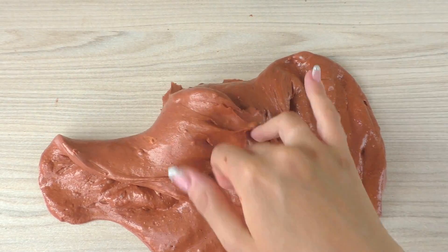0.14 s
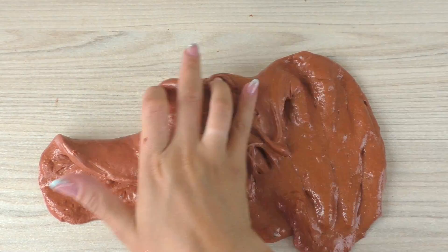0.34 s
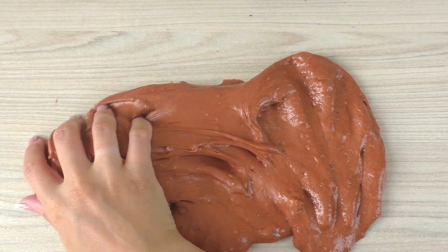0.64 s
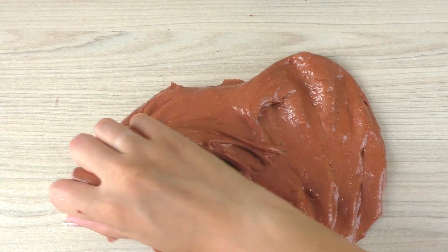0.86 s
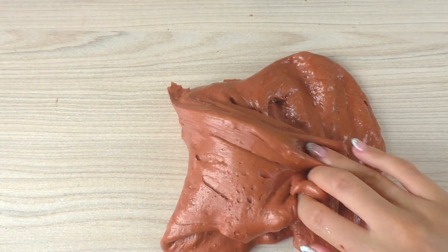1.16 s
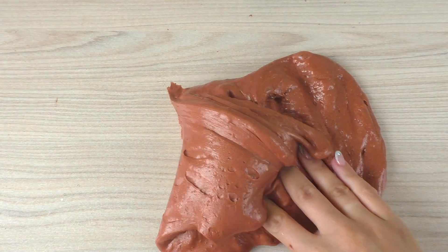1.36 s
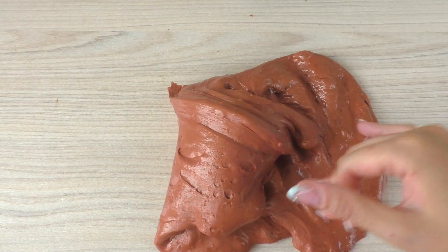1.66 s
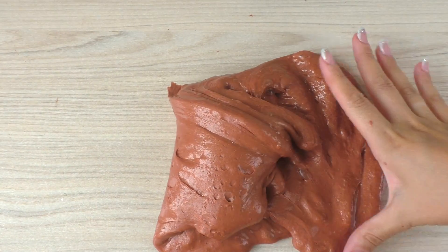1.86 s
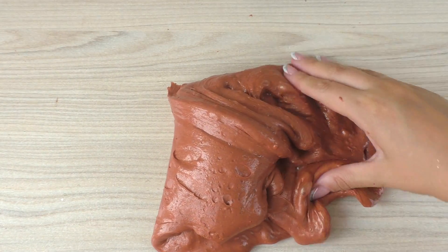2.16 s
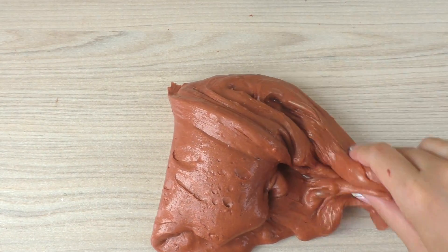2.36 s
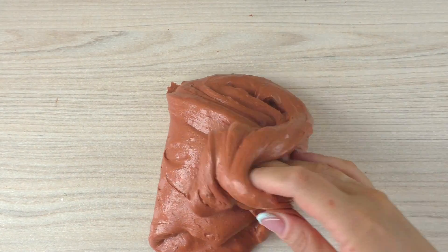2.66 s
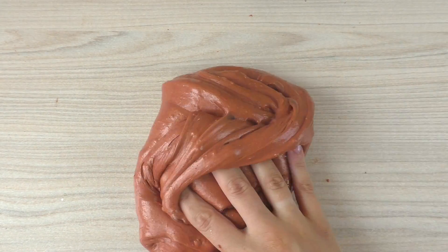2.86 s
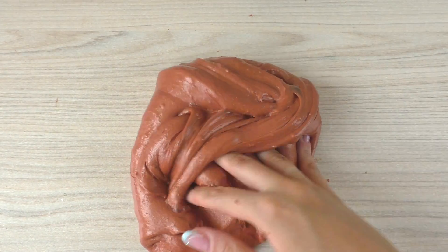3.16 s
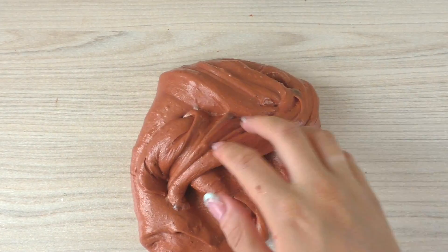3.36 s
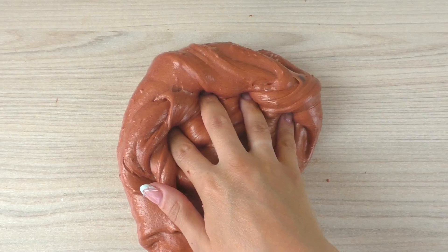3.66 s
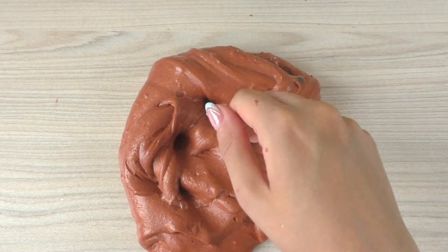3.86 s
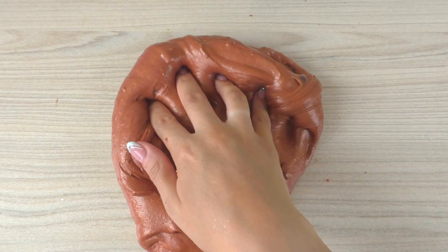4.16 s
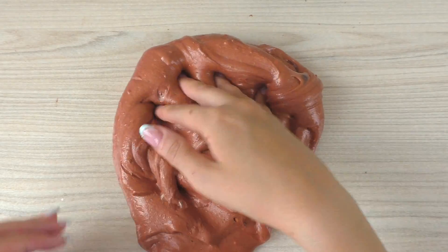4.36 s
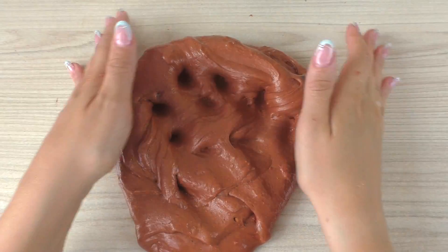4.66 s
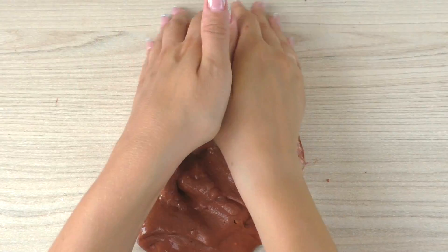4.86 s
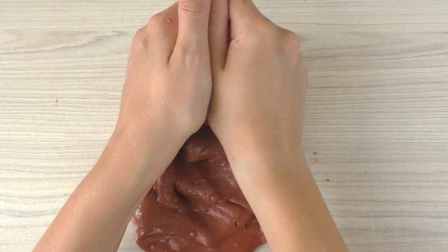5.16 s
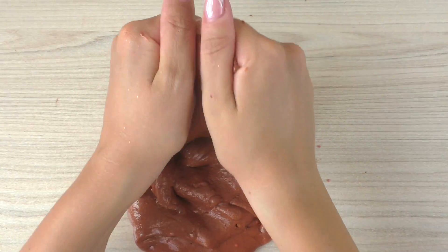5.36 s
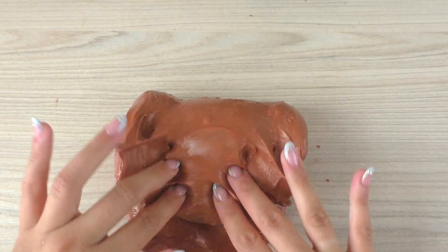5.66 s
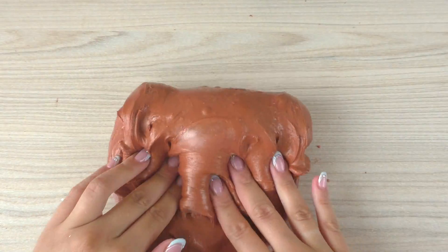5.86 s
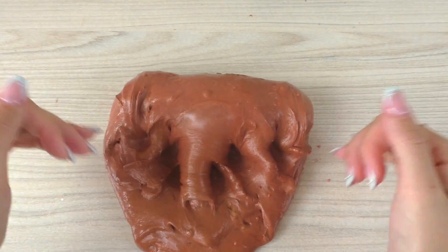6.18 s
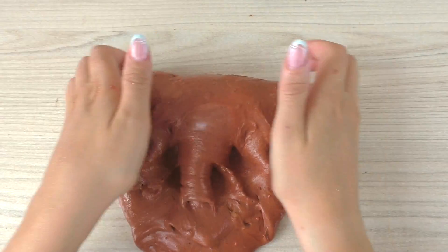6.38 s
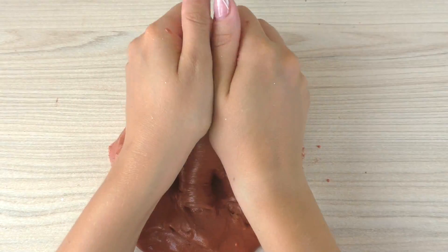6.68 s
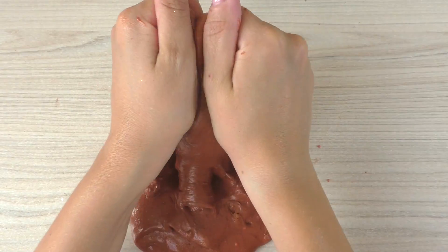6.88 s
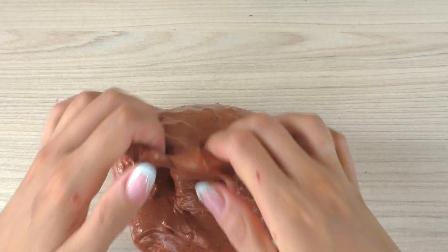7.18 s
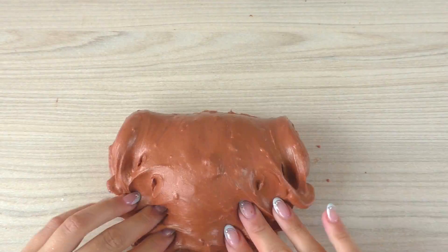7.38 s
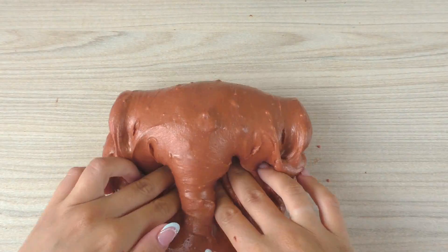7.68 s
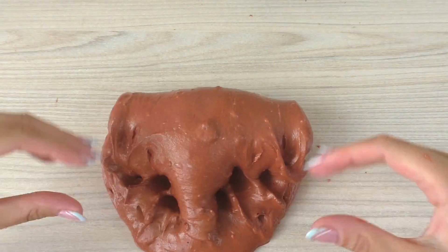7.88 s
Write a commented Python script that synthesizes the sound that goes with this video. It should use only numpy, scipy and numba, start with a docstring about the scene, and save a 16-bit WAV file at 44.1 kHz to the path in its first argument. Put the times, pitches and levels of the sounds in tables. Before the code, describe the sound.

Close-up slime kneading: sticky film peels and crackles, air pockets snap brightly, finger holes gulp softly, with faint table thuds in a quiet room.

```python
"""Hands kneading sticky slime

Hands knead slime on a wooden table under a close stereo microphone in a small quiet room.
Air pockets burst as short two-toned bursts over a random crackle of peeling film; finger holes gulp as
soft low tones. Thuds, gulps and filtered noise ring the low modes of the table top. Noise impulse responses
give close scatter and a short room tail; coloured noise and a narrow noise band make faint hiss and hum."""
import sys
import numpy as np
from scipy import signal
from scipy.fft import rfft, irfft
from scipy.io import wavfile
from numba import njit

SR = 44100
rng = np.random.default_rng(int(sys.argv[2]) if len(sys.argv) > 2 else 0)


def to_wav(s):
    """Save 16-bit WAV."""
    ch = np.atleast_2d(s).T  # columns
    pcm = np.round(np.clip(ch, -1, 1) * 32767)  # PCM
    wavfile.write(sys.argv[1], SR, pcm.astype(np.int16))


N = 354123

PORT_LAG_S = 3.4e-5  # right port after left


def undb(db):
    """Amplitude ratio of a level in dB."""
    return 10 ** (np.asarray(db) / 20)


def band(x, lo_hz, hi_hz):
    """Band-pass along the last axis."""
    sos = signal.butter(2, [lo_hz, min(hi_hz, .45 * SR)], "bandpass", fs=SR, output="sos")
    return signal.sosfilt(sos, x)


@njit
def add_bursts(out, peak_s, hz, rise_s, size, phase):
    """Add tone bursts whose envelope swells for rise_s, peaks at peak_s and dies away."""
    for k in range(len(hz)):
        start = (peak_s[k] - rise_s[k]) * SR
        first = max(int(start) + 1, 0)
        last = min(int(start + 9 * rise_s[k] * SR) + 2, len(out))
        for i in range(first, last):
            t = (i - start) / SR
            u = t / rise_s[k]
            envelope = u * np.exp(1 - u)
            out[i] += size[k] * envelope * np.sin(2 * np.pi * hz[k] * t + phase[k])


def bursts(peak_s, hz, rise_cycles, db, pan_db, lag_s):
    """Bursts at two microphone ports: left is pan_db louder, right is lag_s later."""
    out, one = np.zeros((2, N)), np.ones(len(peak_s))
    phase = 2 * np.pi * rng.random(len(peak_s))
    for port, sign in enumerate((.5, -.5)):
        port_s = peak_s - sign * lag_s
        size = undb(db + sign * pan_db) * one
        add_bursts(out[port], port_s, hz * one, rise_cycles / hz * one, size, phase)
    return out


def pops():
    """A pocket tears open in four quick rips: each rings the pocket, snaps the film higher and ticks broadly."""
    # bursting air pockets, levels before rip fade: (time [s], pocket pitch [Hz], pocket level [dB],
    # film snap pitch [Hz], snap level [dB], left minus right [dB])
    pockets = [(0.0201, 4830, -28, 8150, -27, 1.0), (0.0553, 3320, -26.5, 9500, -44, 0),
               (0.2087, 4000, -27, 7100, -24.5, -1), (0.4103, 1850, -42, 7900, -22.5, 0),
               (0.44, 2900, -21.5, 7800, -13, -2.5), (0.4909, 3330, -33, 9900, -18, -3),
               (0.7804, 6300, -20.5, 5900, -49, -4), (0.838, 3900, -13, 10300, -15, -6),
               (0.8936, 5040, -18, 6000, -30, -9), (0.9368, 3900, -19.5, 10200, -15.5, -3),
               (1.0228, 2700, -12, 7500, -42, -3), (1.3035, 3900, -24, 9600, -27, 3),
               (1.3356, 5500, -12.5, 6000, -44, 2.5), (1.5038, 4480, -39, 7700, -33, -0.0),
               (1.536, 4240, 1.5, 7200, -9, 1), (1.763, 3760, -6, 9500, -8.5, 1),
               (2.0986, 3710, -33.5, 7200, -41.5, -2), (2.2233, 4560, -10.5, 7100, -10.5, -0.5),
               (2.2653, 5990, -39, 10500, -28, 1), (2.275, 5340, -31, 9800, -17, 0),
               (2.2905, 2070, -45, 8600, -18.5, 3), (2.328, 5460, -14.5, 7300, -15, 6),
               (2.3367, 5350, -18, 8400, -4.5, -1), (2.3583, 3270, -19, 8800, -10, 3),
               (2.3734, 3750, -7.5, 8200, -3, 0), (2.378, 3870, -8, 6740, -4, -0.5),
               (2.3957, 4130, -9.5, 7250, -11, 5), (2.4108, 4100, -11, 7300, -21, 0),
               (2.4242, 2160, -17.5, 7200, -15, 2), (2.529, 1440, -27, 6340, -22.5, 4),
               (2.5927, 740, -39, 8900, -24, 1), (2.6595, 4550, -25.5, 10400, -8, -1),
               (2.8202, 4000, -9.5, 7300, -14, 1), (2.9246, 4270, -16, 6500, -40, -2.0),
               (2.9553, 3530, -15, 6140, -15.5, -1), (3.3, 3900, -16, 8300, -53, -4),
               (3.334, 4060, -17, 8400, -28, 2), (3.52, 4640, -24, 9300, -24.5, 0.5),
               (3.568, 1170, -48, 8600, -49, 0), (3.695, 2360, -41, 6340, -54.5, -1),
               (3.8052, 4720, -32.5, 8700, -24, -2), (3.912, 4100, -11.5, 6000, -44, -4),
               (3.9214, 3660, -4, 8900, -16, -2), (3.9528, 3980, -6.5, 8600, -18, 0),
               (3.9586, 4470, -11, 9800, -9, 0), (4.1117, 4000, -20.5, 9000, -20, -2.0),
               (4.125, 930, -45, 6700, -40, -1), (4.1621, 3770, -27, 10300, -22.5, -4.5),
               (4.246, 1090, -49, 9000, -35, -1), (4.2928, 4900, -37.5, 12800, -30, -5),
               (4.42, 6040, -32, 6100, -50, -3), (4.4953, 4350, 0.5, 10000, 5.5, -5.5),
               (4.4966, 1440, -9, 6030, -32, -3), (4.87, 5000, -17.5, 7900, -15.5, -1.0),
               (4.9196, 5130, -26, 6930, -25, -3), (4.956, 2260, -30, 7400, -36, -1),
               (4.973, 3770, -28, 9500, -19, 4), (4.9959, 4740, -21, 6840, -18, -4),
               (5.0457, 5800, -17, 8750, 4, 1), (5.06, 4170, -10, 7900, -17, -5),
               (5.1179, 945, -26.5, 8800, -12, -7.5), (5.1644, 4180, -39, 8750, -17, 2),
               (5.182, 3860, -9, 9600, -3.5, -1), (5.1917, 6030, -13.5, 10500, -11, -4),
               (5.2187, 3600, -23, 9000, -33, -6), (5.2719, 3730, -22, 10500, -11, -2),
               (5.2953, 3100, -14, 14500, 1.5, -4.5), (5.3143, 2800, -14, 9300, -16, 6),
               (5.3339, 3260, 6, 5400, 8, 0.5), (5.3391, 5160, -4, 5700, 1, -2),
               (5.387, 4910, -10.5, 9700, -4, 6), (5.395, 5250, -17, 11300, 6.5, -6),
               (5.4106, 3130, -7.5, 6000, -17, -3), (5.4134, 4460, -12, 10000, -1, -1),
               (5.4241, 5160, -15, 8300, -9, 17), (5.434, 4760, -22, 7260, -13, -6),
               (5.4442, 4450, -20, 11100, -8.5, -17), (5.4509, 4300, -12.5, 10700, 6.5, 3),
               (5.475, 2780, 0, 11800, -21, -0.5), (5.484, 2730, -35, 10100, 2.5, 1.5),
               (5.5041, 2800, -43, 12100, -12.5, -14), (5.5723, 3580, -25, 11500, -18, -4),
               (5.609, 5360, -14.5, 6000, -47, -8.5), (5.6606, 4500, -18, 9500, -35, -6),
               (5.68, 4090, -32, 9400, -13, 3), (5.8592, 3880, -21.5, 8900, -29, 0),
               (5.9305, 4900, -14, 7670, -14.5, -1), (6.2483, 4380, -16, 9200, -5.5, 5),
               (6.4341, 4840, -8, 8100, -7, 4.5), (6.4461, 4300, -10, 8700, -8, -2.0),
               (6.501, 3570, -19.5, 9000, -16, -7), (6.571, 5700, -32, 6860, -19, -4.0),
               (6.7277, 2250, -30, 10000, -34, -4.0), (6.7706, 3700, -19.5, 8900, -16, -3),
               (6.7764, 2110, -14, 9200, -10, -7), (6.8006, 4900, -4, 9000, 2.5, -3.5),
               (6.8416, 5170, -44, 10900, -9, 1), (6.876, 4740, -33, 13600, -8, -8),
               (6.8826, 5700, -9, 12400, 3, -5), (6.9043, 5120, -25, 9900, -13, 6),
               (6.9152, 1400, -15, 10400, -11.5, -5.5), (6.925, 4730, -19, 10500, -35, -8),
               (6.946, 5760, -13, 11440, 20, -2), (6.95, 5500, -4, 10200, 9.5, -6),
               (6.9557, 5130, -15, 9500, -9, 16), (6.9718, 4970, -32, 11200, -1, 6.5),
               (6.9972, 4900, -7.5, 10800, 1.5, -2), (7.0197, 4500, -8.5, 10800, -5, -12.5),
               (7.0273, 3570, -6.5, 6100, -14, 0), (7.0328, 5250, -30, 10900, -1, 0),
               (7.0464, 4100, -5, 7000, -1.5, 5), (7.057, 5950, -14, 9900, 7, -4),
               (7.0727, 3780, -28, 10700, -4, 2), (7.083, 1310, -33, 9040, -32, -4.5),
               (7.1183, 4500, -23, 8900, -11.5, -3), (7.1612, 4070, -18, 7130, -13.5, -2),
               (7.1684, 5100, -29, 10100, -10, -4), (7.2151, 5240, -35, 11300, -6.5, -2),
               (7.2434, 3770, -30, 9700, -13, 0), (7.324, 3930, -11.5, 10100, -10, -4.5),
               (7.4971, 1376, -30.5, 6810, -40.5, 2.5), (7.916, 4700, -18, 6860, -33, -12),
               (7.922, 5540, -16, 9100, -13, 2)]
    s, pocket_hz, pocket_db, snap_hz, snap_db, pan_db = np.vstack([pockets, strays()]).T
    tick_db = np.maximum(pocket_db, snap_db - 9.5) - 12
    chance = rng.standard_normal((len(s), 4, 5))
    out = 0
    for rip in range(4):
        # the first rip varies little
        wait, low, high, size, way = chance[:, rip].T * min(rip + 0.078, 1)
        rip_s = s + 0.00056 * rip * (1 + 0.417 * wait) - .0003
        fade_db = -0.8 - 5.87 * rip + 2.5 * size
        lag_s = PORT_LAG_S * (1 + .5 * way)
        rip_pocket_hz = pocket_hz * np.exp(0.08 * low)
        rip_snap_hz = np.minimum(snap_hz * np.exp(0.14 * high), 16000)
        out = out + bursts(rip_s, rip_pocket_hz, 0.57, pocket_db + fade_db, pan_db, lag_s)
        out = out + bursts(rip_s, rip_snap_hz, 0.77, snap_db + fade_db, pan_db, lag_s)
        out = out + bursts(rip_s, 2800.0, 0.27, tick_db + fade_db, pan_db, lag_s)
    return out


def strays():
    """Rows of small pops at random moments, whose levels follow the peeling around them."""
    pops_per_s = 70
    offset_db, spread_db = 4, 3  # over crackle and fizz
    place, pitch, size, side = rng.random((int(pops_per_s * N / SR), 4)).T
    at = (place * N).astype(int)
    over_db = offset_db - spread_db * np.log(size + .02)
    crackle_db, fizz_db = (db[at] + over_db for db in peel_levels()[:2])
    pocket_hz, snap_hz = 2200 * 2.9 ** pitch, 6500 + 5500 * pitch
    pan_db = 4.2 * (side - .5) - 1.2
    return np.transpose([place * N / SR, pocket_hz, crackle_db, snap_hz, fizz_db, pan_db])


def peeling():
    """Film tears off skin and wood in tiny breaks, each with a mid crack, a bright fizz and a low smack."""
    place, size, side, way = rng.random((20000, 4)).T
    pitch = np.clip(rng.standard_normal((20000, 3)).T, -2.2, 2.2)
    # thicker and thinner film: the colour of the crackle wanders
    pitch = pitch + 1.05 * np.interp(place, np.linspace(0, 1, 160), rng.standard_normal(160))
    # the film lets go in jerks of a few milliseconds
    jerk_db = 2.1 * np.interp(place, np.linspace(0, 1, 1200), rng.standard_normal(1200))
    size_db = jerk_db - 2.38 * np.log(size + 0.0011)
    pan_db = 4.0 * (side - .5) - 1.2
    lag_s = PORT_LAG_S * (1 + 2.5 * (way - .5))
    # crackle, fizz, smack
    centre_hz, spreads, rise_cycles = (3600., 9500., 650.), (.35, .25, .4), (.55, .8, .4)
    out = 0
    for db, hz, spread, cycles, u in zip(peel_levels(), centre_hz, spreads, rise_cycles, pitch):
        break_hz = np.minimum(hz * np.exp(spread * u), 16000)
        x = bursts(place * N / SR, break_hz, cycles, size_db, pan_db, lag_s)
        out = out + x / np.std(x) * undb(db - 8.0)
    return out


def peel_levels():
    """Relative dB per sample of crackle, fizz, smack and table push: powers of both tables and rest add."""
    # fingers pulling out of their holes, and one hand peeling off (at 1.762 s), relative levels:
    # (time [s], hold [s], crackle [dB], fizz [dB], smack [dB])
    pull_rows = [(0.276, 0.0076, -35.5, -32.5, -36.5), (1.762, 0.0023, -19, -22.5, -26.5),
                 (3.309, 0.043, -28, -29, -32), (3.919, 0.038, -28, -27.5, -33),
                 (4.509, 0.03, -31, -29, -28), (6.238, 0.019, -29.5, -26, -33),
                 (7.91, 0.021, -30.5, -26.5, -32.5)]
    # stretches and tears of the film, and short fizz after loud pops, relative levels,
    # attack and release per 30 dB:
    # (time [s], attack [s], hold [s], release [s], crackle [dB], fizz [dB])
    film_rows = [(0.01, .05, 0.0059, 0.1, -50, -42.5), (0.502, .1, 0.034, 0.12, -47, -40.5),
                 (0.652, .04, .02, .1, -55, -52), (0.82, .125, 0.22, 0.15, -36.5, -36),
                 (1.14, .2, 0.12, 0.15, -46, -39.5), (1.346, .05, 0.0045, 0.13, -43.5, -49),
                 (1.535, .01, 0.0045, 0.03, -72.5, -29), (2.125, .14, .005, 0.15, -44, -51),
                 (2.37, .17, .005, 0.23, -25.5, -23), (2.519, .2, 0.0056, 0.044, -33.5, -33.5),
                 (2.648, .16, 0.041, 0.28, -42, -38.5), (2.829, .01, .005, 0.074, -34, -40),
                 (2.947, .07, 0.023, 0.068, -47.5, -33), (3.514, 0.083, .01, 0.19, -58, -61),
                 (3.67, 0.16, 0.072, 0.17, -58.5, -66), (4.13, .06, 0.084, 0.29, -57, -55.5),
                 (4.978, .26, 0.0058, 0.26, -36.5, -34), (5.057, .07, 0.0074, .17, -28, -23),
                 (5.176, .15, 0.14, .09, -41, -46.5), (5.336, .02, 0.0038, 0.063, -27, -12.5),
                 (5.377, .1, 0.072, 0.027, -31.5, -36), (5.635, .35, 0.065, .16, -32.5, -28.5),
                 (5.857, .03, .005, 0.068, -40.5, -44), (5.932, .04, .005, 0.46, -50.5, -48),
                 (6.444, .02, 0.0044, 0.15, -30, -32.5), (6.56, .15, 0.15, 0.95, -42, -41.5),
                 (6.943, .055, 0.0038, 0.055, -27, -23), (6.968, .05, 0.09, 0.085, -50, -26.5),
                 (7.324, .27, .005, 0.1, -31.5, -25), (7.501, .12, .005, .06, -42.5, -49)]
    # hands at rest, relative levels: crackle, fizz, smack, push [dB]
    rest_db = (-69, -69.5, -77.5, -63)
    pull_attack_s, pull_release_s = 0.059, 0.09  # per 30 dB
    pull_push_db = -9.5  # over the smack
    film_smack_db, film_push_db = -11.5, -21  # over the crackle

    t = np.arange(0, N + 44, 44)[:, None] / SR
    s, hold_s, crackle, fizz, smack = np.transpose(pull_rows)
    pull_dbs = (crackle, fizz, smack, smack + pull_push_db)
    pull_powers = [swells(t, s, pull_attack_s, hold_s, pull_release_s, db) for db in pull_dbs]
    *shape, crackle, fizz = np.transpose(film_rows)
    film_dbs = (crackle, fizz, crackle + film_smack_db, crackle + film_push_db)
    film_powers = [swells(t, *shape, db) for db in film_dbs]
    levels = []
    for pull, film, db in zip(pull_powers, film_powers, rest_db):
        total_db = 10 * np.log10(pull + film + undb(db) ** 2)
        levels.append(np.interp(np.arange(N) / SR, t[:, 0], total_db))
    return levels


def swells(t, s, attack_s, hold_s, release_s, db):
    """Summed power of events that rise, hold and fall along straight lines in dB."""
    span_db = 30  # covered in attack_s or release_s
    away = np.maximum((s - t) / attack_s, 0) + np.maximum((t - s - hold_s) / release_s, 0)
    return np.sum(undb(db - span_db * away) ** 2, axis=1)


def gulps():
    """A finger hole closing or opening rings as a soft cavity, with a shorter overtone."""
    # (time [s], cavity level [dB], cavity pitch [Hz])
    holes = [(0.276, -37, 450), (0.302, -32.5, 336), (1.025, -33.5, 324), (1.73, -32, 450),
             (1.751, -32, 357), (1.764, -23, 430), (1.782, -26.5, 301), (3.305, -41, 278),
             (3.349, -22, 326), (3.915, -19.5, 318), (3.931, -19.5, 310), (3.959, -25.5, 470),
             (3.987, -36, 304), (4.497, -18.5, 547), (4.539, -25, 320), (4.556, -30, 334),
             (6.233, -35.5, 335), (6.254, -26, 316), (6.283, -29, 298), (7.888, -30, 303),
             (7.919, -31, 282), (7.932, -31, 457), (7.96, -36, 283)]
    s, db, hz = np.transpose(holes)
    cavity = bursts(s, hz, 0.96, db, -3.0, PORT_LAG_S)
    overtone = bursts(s, 1.58 * hz, .7, db - 5.5, -2.6, PORT_LAG_S)
    return cavity + overtone


def table(gulp):
    """Thuds, gulps and the rumble of the hands' shifting weight ring the low modes of the table top."""
    # presses into the table: (time [s], relative drive [dB])
    presses = [(0.03, -44), (0.312, -44), (0.77, -48), (0.975, -46), (1.33, -50), (1.771, -38),
               (2.05, -41.5), (2.382, -51), (3.374, -31), (3.977, -36), (4.561, -39), (4.84, -43),
               (4.952, -45.5), (5.074, -42.5), (5.339, -46.5), (6.293, -37.5), (6.953, -53), (7.047, -48),
               (7.33, -45), (7.541, -42.5), (7.934, -32)]
    # table modes: (pitch [Hz], relative level [dB], T60 [s])
    modes = [(56.4, -3, 0.27), (102, -11.5, 0.23), (161, -23.5, 1.4), (253, -18.5, 0.24), (305, -17, 0.09)]
    s, db = np.transpose(presses)
    thud = bursts(s - .015, 76.0, 0.44, db, -5.5, 0.)

    noise = rng.standard_normal((2, N)) + 0.7 * rng.standard_normal(N)  # partly shared
    rumble = band(noise, 40, 200)
    rumble = rumble / np.std(rumble) * undb(peel_levels()[3] + np.array([[-1.5], [1.5]]))
    # the weight wavers
    waver_db = 3.0 * np.interp(np.arange(N), np.linspace(0, N, 60), rng.standard_normal(60))
    rumble = rumble * undb(waver_db)

    t = np.arange(SR // 2) / SR  # ring stops at 0.5 s
    ring = sum(undb(d) * np.sin(2 * np.pi * hz * t) * 1000. ** (-t / t60) for hz, d, t60 in modes)
    push = thud + undb(-11.5) * rumble + undb(7.5) * gulp
    rung = signal.fftconvolve(push, ring[None])[:, :N]
    return undb(-43.5) * rung + undb(-3.5) * rumble


def hands(x):
    """Quick scatter off fingers, slime and table: six noise responses crossfade in turn, shifting colour."""
    pose_s, t60_s, level_db = .06, 0.054, -5
    pose = np.arange(N) / SR / pose_s % 6
    out = 0
    for k in range(6):
        distance = np.minimum(abs(pose - k), 6 - abs(pose - k))
        share = np.maximum(1 - distance, 0)
        out = out + signal.oaconvolve(x * share, decay(.04, t60_s), axes=1)[:, :N]
    return undb(level_db) * band(out, 430, 22000)


def room(x):
    """Wall tail as decaying noise: builds up in 1.3 ms, its added treble fading more slowly."""
    t60_s, treble_t60_s, level_db = 0.26, 0.48, -12
    body = band(decay(.5, t60_s), 480, 13000)
    treble = band(decay(.5, treble_t60_s), 7700, 21000)
    tail = body + undb(-11.0) * treble
    tail = tail * np.minimum(np.arange(tail.shape[1]) / SR / 0.0013, 1)
    return undb(level_db) * signal.fftconvolve(x, tail, axes=1)[:, :N]


def decay(seconds, t60_s):
    """Stereo noise, partly alike left and right, dying away; left-channel energy 1."""
    t = np.arange(int(seconds * SR)) / SR
    noise = rng.standard_normal((2, len(t))) + 0.64 * rng.standard_normal(len(t))
    x = noise * 1000. ** (-t / t60_s)
    return x / np.linalg.norm(x[0])


def quiet():
    """Steady coloured noise as hiss and rumble, least alike left and right in the treble; narrow noise as hum."""
    # background spectrum: (frequency [Hz], relative density [dB])
    spectrum = [(18, -30.5), (30, 2), (75, -13.5), (145, -34), (426, -23.5), (512, -22), (740, -30),
                (988, -29), (8300, -32), (14800, -34), (16000, -33)]
    hiss_db, hum_hz, hum_db = -57.5, 149.7, -68.5
    hz = np.maximum(np.arange(N // 2 + 1) * SR / N, 1)
    point_hz, point_db = np.transpose(spectrum)
    colour = undb(np.interp(np.log(hz), np.log(point_hz), point_db))
    own, shared = rfft(rng.standard_normal((2, N))), rfft(rng.standard_normal(N))
    hiss = irfft(colour * (own + shared * 0.23 / (1 + hz / 1500)), N)
    hum = band(rng.standard_normal(N), hum_hz - 8, hum_hz + 8)
    hum = hum / np.std(hum) * undb(hum_db + np.array([[-2.5], [2.5]]))  # left, right
    return hiss / np.std(hiss) * undb(hiss_db) + hum


def scene():
    """Slime sounds with their scatter, room tail and table ring over the quiet."""
    gulp = gulps()
    slime = pops() + peeling() + gulp
    return slime + hands(slime) + room(slime) + table(gulp) + quiet()


def record(dry):
    """The microphone loses the deepest bass, peaks beyond full scale clip and the top is cut steeply."""
    bass = signal.butter(2, 38, "highpass", fs=SR, output="sos")
    top = signal.ellip(12, .2, 70, 16400, fs=SR, output="sos")
    clipped = np.clip(signal.sosfilt(bass, dry), -1, 1)
    return np.clip(signal.sosfilt(top, clipped), -1, 1)


dry = scene()
out = record(dry)
to_wav(out)
```